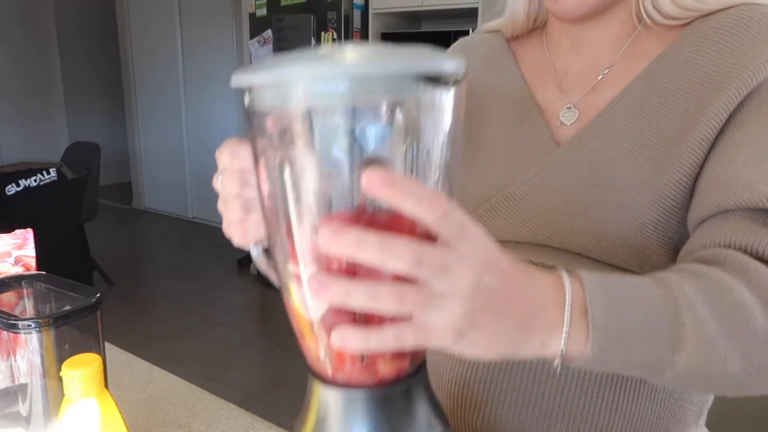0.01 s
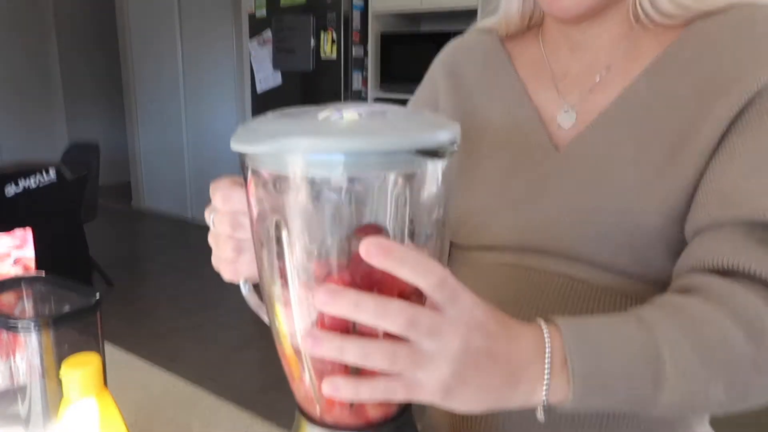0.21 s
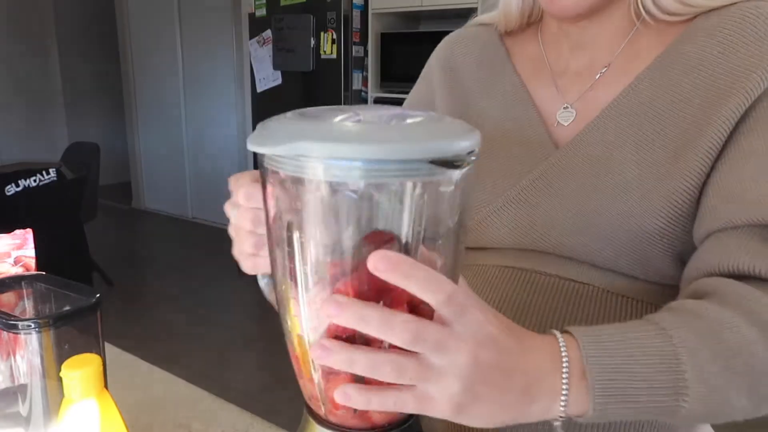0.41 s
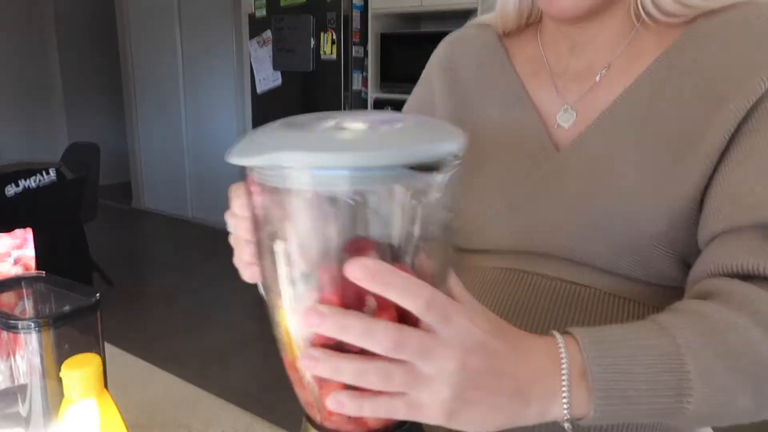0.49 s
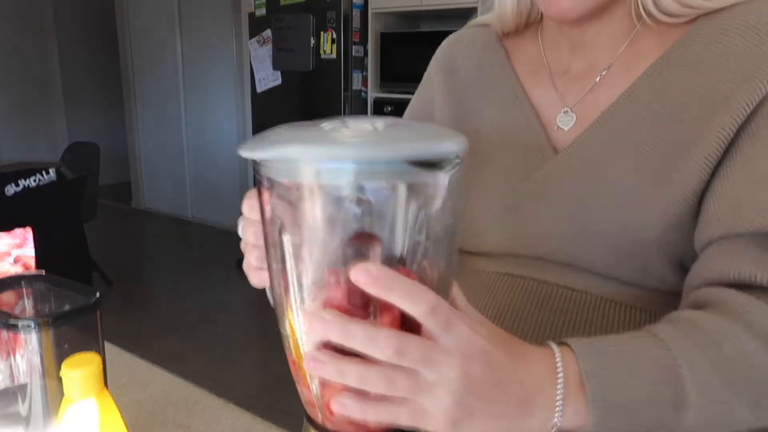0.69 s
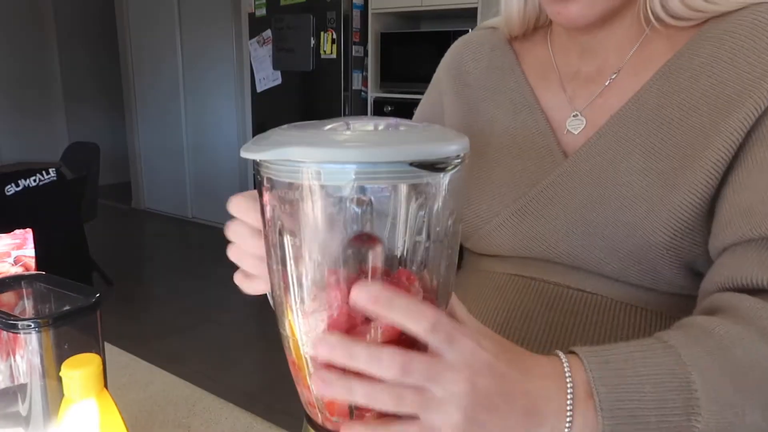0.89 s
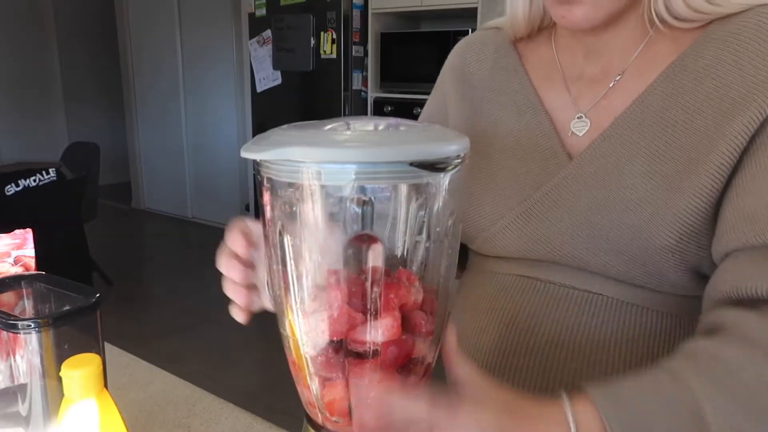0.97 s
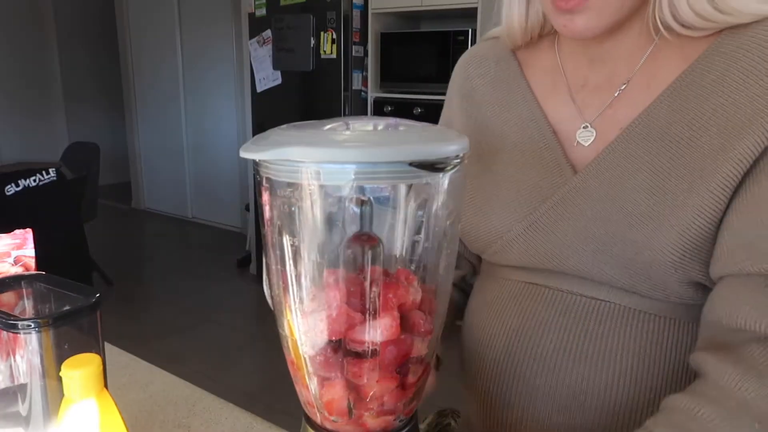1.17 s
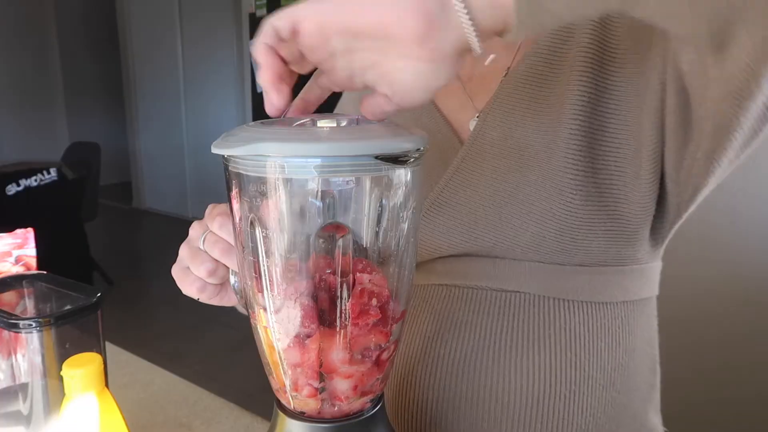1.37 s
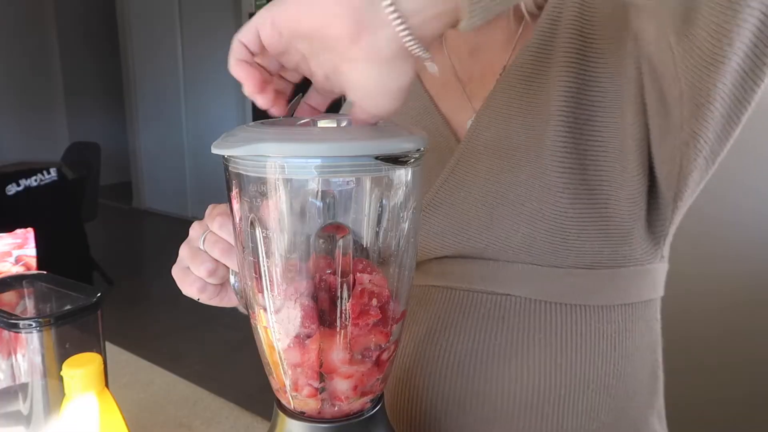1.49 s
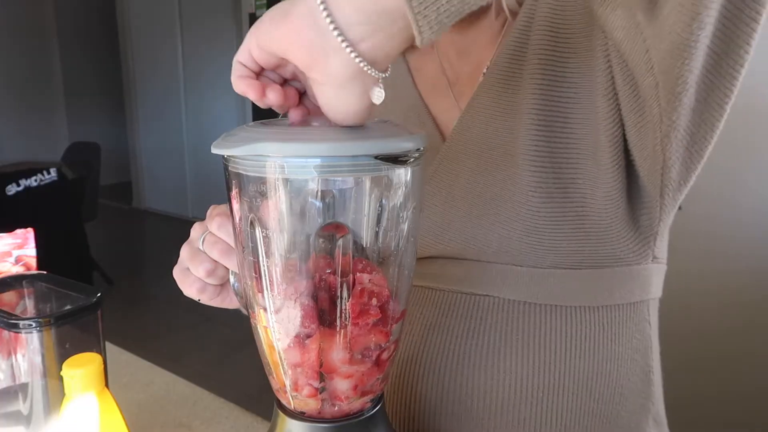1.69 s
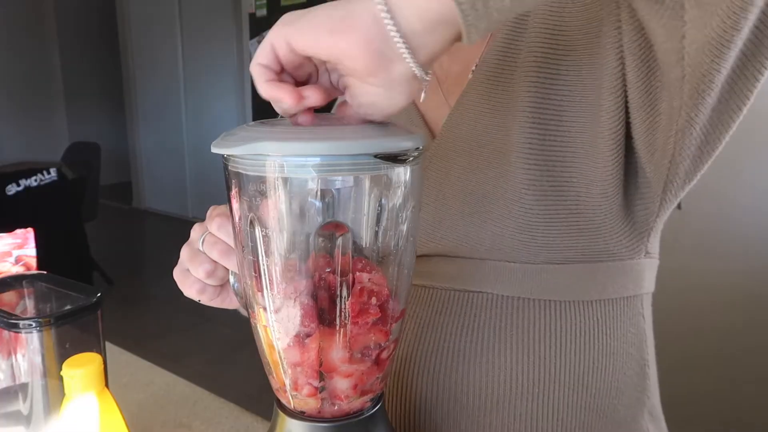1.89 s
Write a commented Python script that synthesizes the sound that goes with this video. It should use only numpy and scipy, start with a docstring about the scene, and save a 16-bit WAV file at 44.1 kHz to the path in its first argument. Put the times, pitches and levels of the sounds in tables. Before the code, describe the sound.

Close stereo sound in a quiet kitchen: soft hand noise, one hard knock of a loaded glass jar on a blender base, low counter bumps while it settles, a palm scuff, then sharp plastic cap clicks.

```python
"""Faint room air, a treble hiss, a thin high tone and soft hand noise come first; then a heavy glass jar of frozen fruit
lands on its blender base and is rocked into place: the counter booms, base and glass ring and grate.
A palm scuffs across plastic, then a hand brushes the lid and works its cap, which clicks and crunches.
Air, hands and scuff are shaped noise, the boom is swelling sines, and blows and grains strike ringing modes.
Blows and grating also reach the kitchen, whose reflections are noise dying band by band."""
import sys
import numpy as np
from scipy import signal
from scipy.fft import rfft, irfft, next_fast_len
from scipy.io import wavfile

SR = 44100
rng = np.random.default_rng(int(sys.argv[2]) if len(sys.argv) > 2 else 0)


def put_to_file(sound):
    """Save the sound as 16-bit audio at rate SR, in the file named by the first command-line argument."""
    columns = np.atleast_2d(sound).T  # one column per channel
    safe = np.clip(columns, -1, 1)
    whole_steps = np.round(safe * 32767)
    wavfile.write(sys.argv[1], SR, whole_steps.astype(np.int16))


N = 85995  # length in samples


def from_db(db):
    """Turn decibels into an amplitude factor."""
    return 10 ** (np.asarray(db) / 20)


def rms_one(x):
    """Scale a signal to rms 1."""
    return x / np.sqrt(np.mean(x ** 2) + 1e-20)


def in_time(rows):
    """Draw straight lines through (time_s, level_db) points."""
    time_s, level_db = np.transpose(rows)
    return np.interp(np.arange(N) / SR, time_s, level_db)


def at_hz(points, hz):
    """Read a spectrum curve at a frequency, on a logarithmic pitch scale."""
    points = np.array(points)
    return np.interp(np.log(hz), np.log(points[:, 0]), points[:, 1])


def drift(rate_hz):
    """Slow random wander of rms 1: noise through two equal low-pass poles, drawn every 40 samples."""
    pole = np.exp(-80 * np.pi * rate_hz / SR)
    noise = rng.standard_normal(N // 40 + 2002)
    slow = signal.lfilter([1], [1, -2 * pole, pole * pole], noise)[2000:]  # drop the settling
    return np.interp(np.arange(N) / 40, np.arange(len(slow)), rms_one(slow))


def ring(clicks, hz, t60_s):
    """A two-pole resonator: a unit click starts a decaying sine of height 1."""
    pole = from_db(-60 / (t60_s * SR))
    angle = 2 * np.pi * hz / SR
    return signal.lfilter([0, np.sin(angle)], [1, -2 * pole * np.cos(angle), pole * pole], clicks + 1e-18)


# left-right likeness of diffuse sound, clipped to -1..1 in use: pitch_hz, likeness [no unit]
LIKENESS = [(60, .999), (200, 0.98), (700, 0.94), (4400, 0.8), (8000, -1.2), (15000, 0.011)]


def banded_noise(spectrum, patchy_db):
    """Half-octave bands of stereo noise, each with its own level, flicker and likeness; rms 1."""
    out = 0
    shared_flicker = drift(25)
    edges_hz = 28 * 2 ** np.arange(0, 9.6, .5)
    white = rng.standard_normal((2, 2, N))
    low_limit_hz, high_limit_hz = spectrum[0][0] / 2, spectrum[-1][0] * 2
    for k, (low_hz, high_hz) in enumerate(zip(edges_hz, edges_hz[1:])):
        hz = np.sqrt(low_hz * high_hz)
        if low_limit_hz < hz < high_limit_hz:
            band_filter = signal.butter(2, [low_hz, high_hz], "band", fs=SR, output="sos")
            mid, side = signal.sosfilt(band_filter, white[k % 2])
            alike = np.clip(at_hz(LIKENESS, hz), -1, 1)
            flicker_db = patchy_db * (shared_flicker + drift(20.6))
            gain = from_db(at_hz(spectrum, hz) + flicker_db)
            out = out + gain * (np.sqrt(1 + alike) * mid + np.sqrt(1 - alike) * side * [[1], [-1]])
    return rms_one(out)


# colour of the room air: pitch_hz, relative level_db
AIR_COLOUR = [(35, -27.5), (70, -18.5), (150, -21), (400, -29.5), (800, -37), (2000, -45), (5000, -47.5),
              (9000, -54.5), (15000, -79.5)]
AIR_DB = -59.5


def room_air():
    """Steady broadband noise, strongest in the bass."""
    return from_db(AIR_DB) * banded_noise(AIR_COLOUR, patchy_db=-0.5)


# colour of the treble hiss: pitch_hz, relative level_db
HISS_COLOUR = [(3000, -7.5), (6000, -4), (11500, -9)]
HISS_DB, HISS_END_S = -63.5, .2


def treble_hiss():
    """Faint treble noise that stops as the jar lands."""
    sounding = np.arange(N) / SR < HISS_END_S
    return from_db(HISS_DB) * banded_noise(HISS_COLOUR, patchy_db=-1.5) * sounding


WHINE_HZ, WHINE_DB = 13050, -86


def whine():
    """A thin, steady high sine."""
    return from_db(WHINE_DB) * np.sin(2 * np.pi * WHINE_HZ * np.arange(N) / SR)


# dull handling noise over time: time_s, level_db
HANDLING = [(0, -46), (.19, -51.5), (.4, -48), (.65, -41.5), (.85, -48.5), (1.0, -77), (1.2, -57.5),
            (1.3, -54.5), (1.37, -72), (1.6, -79), (1.8, -63), (1.95, -79)]
# its colour: pitch_hz, relative level_db
HANDLING_COLOUR = [(30, -6.5), (60, 0.5), (160, 3.5), (300, -6.5), (480, -13.5), (1000, -15), (1600, -30.5)]


def handling_noise():
    """Dull noise of the hands, mostly bass, rising and falling with the handling."""
    return from_db(in_time(HANDLING)) * banded_noise(HANDLING_COLOUR, patchy_db=2.0)


# hands and sleeve brushing jar and lid: time_s, level_db
BRUSH = [(0, -64), (.12, -65), (.15, -57.5), (.2, -52), (.45, -56.5), (.6, -58), (.72, -57), (.9, -61.5),
         (1.05, -69), (1.2, -82), (1.228, -60), (1.25, -52), (1.33, -52.5), (1.44, -49), (1.53, -51.5),
         (1.62, -45.5), (1.67, -49.5), (1.8, -44.5), (1.87, -49), (1.95, -45.5)]
# colour of the brushing: pitch_hz, relative level_db
BRUSH_COLOUR = [(500, -11), (900, -7), (1500, -8), (2100, -0.5), (3200, -7), (4800, -17.5), (7000, -17.5),
                (10000, -31.5), (15000, -41.5)]


def brushing():
    """Friction of skin and sleeve: patchy noise that follows the strokes."""
    return from_db(in_time(BRUSH)) * banded_noise(BRUSH_COLOUR, patchy_db=.9)


# pushes of the jar on the counter; weak ones let the boom die down:
# start_s, then the level_db that each mode in COUNTER swells towards (six columns)
PUSHES = [(0.141, -37, -56, -39, -63, -65, -54), (0.203, -4, -5.5, -27, -9, -9, -16.5),
          (0.244, -10, -34, -14.5, -6, -5, -16.5), (0.296, -18.5, -19, -24.5, -19.5, -17.5, -37),
          (0.332, -25.5, -48, -28, -40, -34, -34.5), (0.397, -36, -29, -41, -31, -36, -47.5),
          (0.473, -25.5, -24, -55, -37, -35, -47), (0.53, -19, -23, -26.5, -38, -41.5, -49),
          (0.556, -24.5, -10.5, -46, -29.5, -32, -48), (0.609, -21, -41, -31.5, -31.5, -32.5, -49),
          (0.649, -15.5, -25.5, -35.5, -39, -37.5, -46), (.71, -31.5, -37, -53, -46, -53, -51),
          (0.756, -21.5, -20.5, -37, -45, -34, -37.5), (0.778, -16, -49, -46, -41, -29.5, -59),
          (0.851, -27, -40, -41, -53, -51.5, -52), (0.929, -36.5, -39, -50.5, -60, -58.5, -61.5),
          (0.986, -31.5, -46.5, -66, -59, -60, -55.5), (1.141, -41, -53, -52, -81, -58.5, -78),
          (1.236, -36.5, -59, -44.5, -39, -45.5, -47), (1.272, -28, -46, -52, -56, -48, -56),
          (1.353, -76, -62, -93, -47.5, -56, -48.5), (1.492, -74, -72, -51.5, -42.5, -49.5, -62),
          (1.594, -74, -67, -64, -59, -48, -50), (1.685, -38, -40.5, -37, -32, -44, -48)]
# modes of counter and base: pitch_hz, t60_s, swell_s (time constant), waver [random pitch wander, share of pitch]
COUNTER = [(54.4, 0.18, 0.0057, 0.027), (99.27, 0.14, 0.015, 0.0076), (157.2, 0.15, .005, 0.065),
           (246, 0.05, 0.0079, .05), (344.3, 0.25, 0.0023, 0.013), (453, 0.11, 0.0027, 0.029)]
FLUTTER_DB = 1.1          # unevenness of the boom
COUNTER_SIDE_DB = -32.5   # lean of a 150 Hz mode to one side; it grows with pitch


def counter():
    """Each push swells every mode and lets it die; a new push takes over from the last."""
    t = np.arange(N) / SR
    pushes = np.array(PUSHES)
    last = np.maximum(np.searchsorted(pushes[:, 0], t) - 1, 0)
    age_s = np.maximum(t - pushes[last, 0], 0)
    out = 0
    for k, (hz, t60_s, swell_s, waver) in enumerate(COUNTER):
        target = from_db(pushes[last, k + 1] - 60 * age_s / t60_s) * (t > pushes[0, 0])
        pole = np.exp(-1 / (swell_s * SR))
        level = signal.lfilter([1 - pole], [1, -pole], target)
        moving_hz = hz * (1 + waver * drift(18.1))
        phase = 2 * np.pi * (np.cumsum(moving_hz) / SR + rng.random())
        lean = from_db(COUNTER_SIDE_DB) * hz / 150 * np.cos(phase) * [[1], [-1]]
        out = out + level * from_db(FLUTTER_DB * drift(40)) * (np.sin(phase) + lean)
    return out


CONTACT_S = .0002      # a touch is softened over about this long before it cracks
RANDOM_SHIFT = 2.5     # each blow's mode pitches are shifted at random, in Hz, divided by t60 in s
BRIGHT_TOP_HZ = 5570   # brightness stops rising above this
HARD_FROM_HZ, HARD_SHARE = 6000, .4   # treble modes favour hard blows: extra dB per dB of strength


def strikes(events, modes, cycles, chatter_s, chatter_db, count=6):
    """Each blow is a few quick touches; it cracks at a pitch of its own and strikes every mode of the body."""
    start_s, level_db, crack_hz, tilt_db, body_db = np.transpose(events)
    when, sign = rng.random((len(start_s), 2, count)).transpose(1, 0, 2)
    when[:, 0] = 0  # the first touch is the main one; the rest chatter after it
    chatter = from_db(chatter_db - 3.65 * when) * np.sign(sign - .5)
    size = np.where(when > 0, chatter, 1) * from_db(level_db)[:, None] / 2
    lag = (chatter_s * when * SR).astype(int)
    scatter, shift = rng.standard_normal((len(start_s), 2, len(modes))).transpose(1, 0, 2)
    soft = np.hanning(int(CONTACT_S * SR) + 2)
    soft = soft / soft.sum()
    crack_len = SR // 40
    out = np.zeros(N + SR)
    for k, start in enumerate((start_s * SR).astype(int)):
        touches = np.zeros(SR)
        np.add.at(touches, lag[k], size[k])
        softened = np.convolve(touches[:crack_len], soft)[:crack_len]
        out[start:start + crack_len] += ring(softened, crack_hz[k], cycles / crack_hz[k])
        for m, (mode_hz, mode_db, t60_s) in enumerate(modes):
            span = min(int((chatter_s + 1.5 * t60_s) * SR), SR)
            bright_db = tilt_db[k] * np.log2(min(mode_hz, BRIGHT_TOP_HZ) / 2500)
            hard_db = HARD_SHARE * level_db[k] * (mode_hz > HARD_FROM_HZ)
            gain = from_db(mode_db + body_db[k] + 2 * scatter[k, m] + bright_db + hard_db)
            shift_hz = np.clip(RANDOM_SHIFT * shift[k, m] / t60_s, -mode_hz / 10, mode_hz / 10)
            rung = ring(touches[:span], mode_hz + shift_hz, t60_s)
            out[start:start + span] += (-1) ** m * gain * rung
    return out[:N]


# modes of the jar on its base: pitch_hz, relative level_db, t60_s
JAR = [(698, -30, 0.04), (1010, -18.5, 0.045), (1244, -9.5, 0.031), (1480, -7, 0.013), (1766, -5.5, 0.028),
       (1931, -6, 0.02), (2090, -10, 0.01), (3070, -13.5, 0.017), (2550, -2.5, 0.018), (3352, -4, 0.01),
       (3826, -8, 0.008), (4560, -15, 0.0027), (5670, -22, 0.0072), (6600, -25.5, 0.0027),
       (8130, -39.5, .004), (10100, -37, 0.002)]
# long, faint ring of the glass: pitch_hz, relative level_db, t60_s
GLASS = [(5367, -52, .3), (6495, -57, .2), (7270, -67, .75), (7281, -71, .6)]
# knocks of jar on base: start_s, relative level_db, crack_hz, brightness [dB per octave], body_ring_db
KNOCKS = [(.2040, -2, 2620, 0.5, 1.5), (.2154, -18.5, 1500, -5.5, 4), (.2415, -14.5, 2000, -2, 0),
          (.2447, 4, 3020, 6.5, -1), (.2487, -14.5, 3600, 7, 8), (.2527, -28, 3520, -15.5, -3),
          (.2672, -23, 2960, -2, -4), (.5295, -24.5, 2340, -3, -1), (.5526, -20, 2300, -8.5, -1.8),
          (.6918, -38.5, 4300, 12, -7.5), (.7652, -39.5, 3630, 15.5, -1.5), (.7771, -29, 1950, 0.5, -10),
          (.9542, -35, 2240, -1, -5.5), (.9856, -45.5, 2085, -1, 4.5), (1.2305, -36.5, 2020, -4, 2.3),
          (1.2378, -33.5, 2230, -5, 3)]


def jar_knocks():
    """Jar hits base: short three-cycle cracks over the ring of base and glass."""
    return strikes(KNOCKS, JAR + GLASS, cycles=3, chatter_s=0.001818, chatter_db=-9)


GRAINS_PER_S = 1900


def grating(level, modes):
    """Dense uneven touches stir the modes of a body."""
    touched = rng.random(N) < GRAINS_PER_S / SR
    grains = touched * rng.standard_normal(N) * from_db(in_time(level))
    return sum((-1) ** k * from_db(db) * ring(grains, hz, t60_s) for k, (hz, db, t60_s) in enumerate(modes))


# the jar grates as it turns on the base: time_s, grain level_db
GRATING = [(.203, -76), (.207, -32), (.24, -49), (.25, -39), (.4, -56.5), (.528, -69), (.533, -46.5),
           (.6, -49.5), (.66, -62), (.74, -90), (.765, -48), (.8, -58), (.87, -73.5), (1.0, -83),
           (1.222, -91), (1.232, -46.5), (1.27, -62), (1.34, -55.5), (1.37, -85)]
GLASS_GRATE_DB = 16.5   # grating stirs the glass this much more than knocks do


def jar_grating():
    """Grains of friction stir the jar, its base and the glass."""
    glass = [(hz, db + GLASS_GRATE_DB, t60_s) for hz, db, t60_s in GLASS]
    return grating(GRATING, JAR + glass)


PORT_HZ, PORT_DB = 7000, 3.5   # where the ports part in phase, and the side level well above it


def ports(x):
    """A near sound at the two microphone ports: alike in the bass, turning apart in phase in the treble."""
    size = next_fast_len(N)
    hz = np.fft.rfftfreq(size, 1 / SR)
    side_gain = from_db(PORT_DB) / np.sqrt(1 + (PORT_HZ / (hz + 1)) ** 5.5)
    side = irfft(1j * rfft(x, size) * side_gain, size)[:N]  # a quarter turn in phase
    return x + side * [[1], [-1]]


# reverberation of the kitchen: low_hz, high_hz, t60_s, relative level_db, side_minus_mid_db
KITCHEN = [(284, 790, 0.18, 3.5, -27.5), (1280, 3000, 0.31, -6.5, -16.5), (3230, 8000, 0.31, -7, -39.5),
           (5700, 11000, 0.62, -21, 13.5)]
FIRST_ECHO_S = 0.0014


def kitchen(x):
    """Dense reflections: noise that dies band by band, one draw for mid and one for side."""
    t = np.arange(SR // 2) / SR
    white = rng.standard_normal((2, len(t))) * (t > FIRST_ECHO_S)
    tail = 0
    for low_hz, high_hz, t60_s, db, side_db in KITCHEN:
        band = signal.sosfilt(signal.butter(2, [low_hz, high_hz], "band", fs=SR, output="sos"), white)
        gain = from_db([[db], [db + side_db]]) / np.sqrt(t60_s * SR / 14)  # longer tails start softer
        tail = tail + band * from_db(-60 * t / t60_s) * gain
    mid, side = signal.fftconvolve(tail, x[None])[:, :N]
    return mid + side * [[1], [-1]]


# colour of a palm on smooth plastic: pitch_hz, relative level_db
SCUFF_COLOUR = [(1300, -35.5), (1900, -0.5), (2800, 0.5), (4200, -5.5), (5500, -14), (8000, -20),
                (15000, -23)]
SCUFF_S, SCUFF_DB = 1.132, -52.5
SCUFF_SWELL_S, SCUFF_HOLD_S, SCUFF_RELEASE_S = 0.0045, 0.044, 0.022   # hold counts from the start


def scuff():
    """One short stroke of friction noise: swell, hold, exponential release."""
    t = np.arange(N) / SR - SCUFF_S
    swell = np.clip(t / SCUFF_SWELL_S, 0, 1)
    release = np.exp(-np.maximum(t - SCUFF_HOLD_S, 0) / SCUFF_RELEASE_S)
    return from_db(SCUFF_DB) * swell * release * banded_noise(SCUFF_COLOUR, patchy_db=1.5)


# modes of the lid: pitch_hz, relative level_db, t60_s
LID = [(1160, -12, 0.0073), (1614, -8, 0.016), (1794, -7, .025), (2163, -7, 0.026), (2425, -11.5, 0.037),
       (2820, -4.5, 0.0068), (3140, -10.5, 0.016), (3700, -10, 0.017), (4150, -10.5, 0.016),
       (4740, -14.5, 0.011), (5720, -13.5, 0.0055), (7200, -15.5, 0.0065), (8740, -15, 0.0027),
       (12630, -19, 0.002)]
# clicks of the cap in the lid: start_s, relative level_db, crack_hz, brightness [dB per octave], body_ring_db
CLICKS = [(1.379, -29.5, 4500, 12, -10), (1.3985, -32.5, 5000, 18, -11), (1.4618, -24, 1530, 10.5, -14),
          (1.4664, -20, 2250, 1, -6), (1.5503, -17, 3480, 5, -24), (1.5506, -24.5, 2120, 5, -2),
          (1.5619, -27, 2000, 1, 4), (1.5907, -19, 1630, -2.5, -1.5), (1.607, -39.5, 1900, -5, 17),
          (1.6816, -15, 1600, 5, 1), (1.6885, -6.5, 2795, 4.5, 0), (1.6939, -8, 1830, 8.5, -4.5),
          (1.6999, -11.5, 2460, -3.5, 0), (1.7235, -16.5, 2730, -12, -11), (1.7502, -24.5, 2560, -13, -5),
          (1.7913, -30, 3600, 1.5, 6.5), (1.8868, -28, 2480, -3.5, 6), (1.8912, -23.5, 2370, -4.5, 2)]


def cap_clicks():
    """The cap snaps in the lid: longer-ringing cracks, with the plastic modes of the lid."""
    return strikes(CLICKS, LID, cycles=35.3, chatter_s=.006, chatter_db=-12)


# the cap crunches as it is forced round: time_s, grain level_db
CRUNCH = [(1.68, -90), (1.682, -25), (1.698, -28), (1.72, -42), (1.77, -51), (1.88, -60.5), (1.89, -42),
          (1.93, -55)]


def cap_crunch():
    """Grains of friction stir the lid."""
    return grating(CRUNCH, LID)


def scene():
    """Air and hands, the boom of the counter, and the blows and grating with their room."""
    background = room_air() + treble_hiss() + whine()
    hands = handling_noise() + brushing() + scuff()
    blows = jar_knocks() + jar_grating() + cap_clicks() + cap_crunch()
    return background + hands + counter() + ports(blows) + kitchen(blows)


RUMBLE_CUT_HZ, CUTOFF_HZ = 30, 16300
TOP = 1.25   # ceiling of the rounded peaks, as amplitude


def record(dry):
    """The deepest bass is cut, peaks are rounded, the top is cut."""
    thin = signal.sosfilt(signal.butter(2, RUMBLE_CUT_HZ, "high", fs=SR, output="sos"), dry)
    rounded = TOP * np.tanh(thin / TOP)
    return signal.sosfilt(signal.cheby2(12, 70, CUTOFF_HZ, fs=SR, output="sos"), rounded)


dry = scene()
out = record(dry)
put_to_file(out)
```